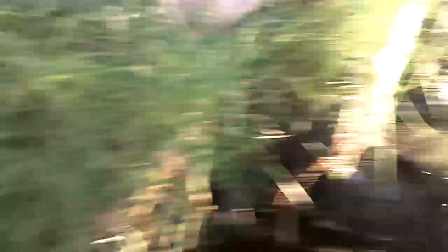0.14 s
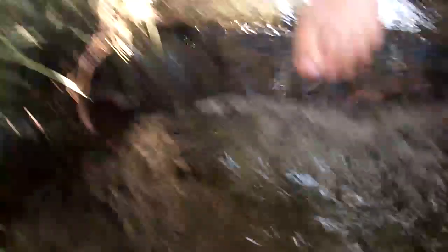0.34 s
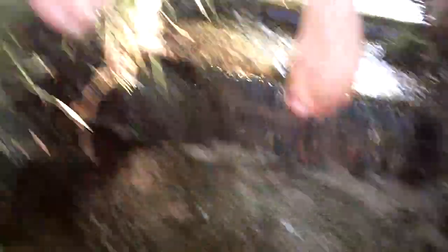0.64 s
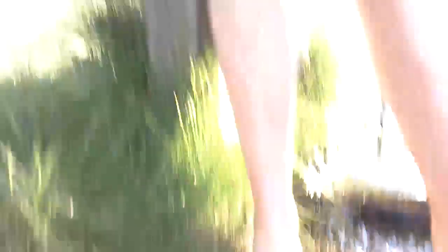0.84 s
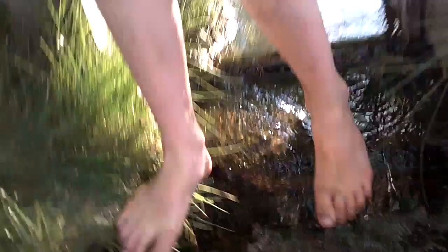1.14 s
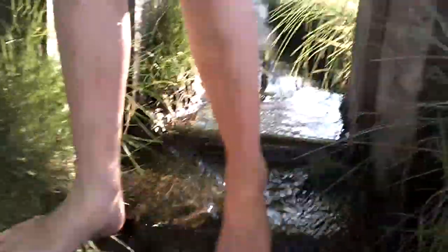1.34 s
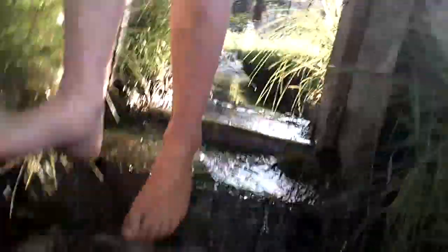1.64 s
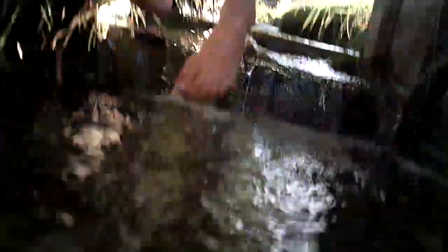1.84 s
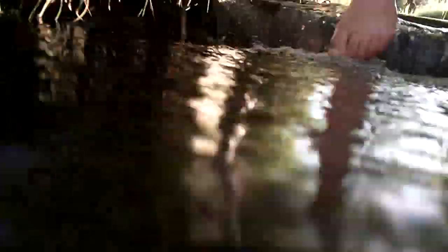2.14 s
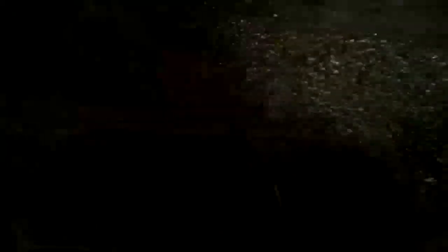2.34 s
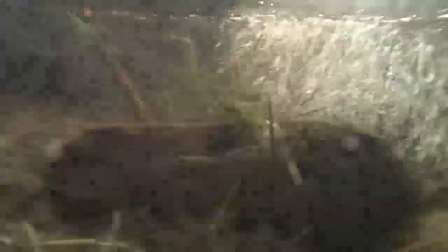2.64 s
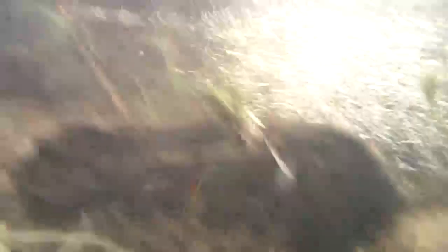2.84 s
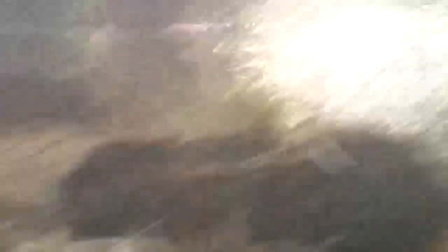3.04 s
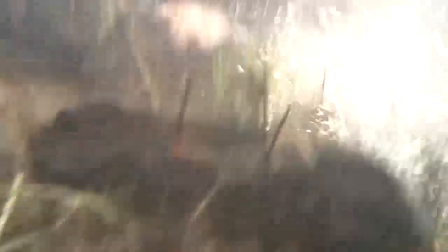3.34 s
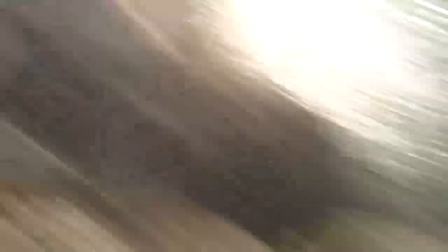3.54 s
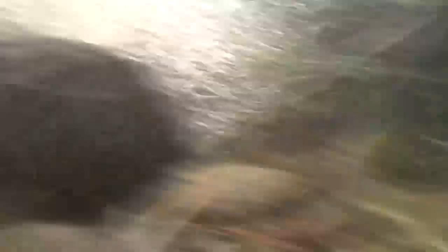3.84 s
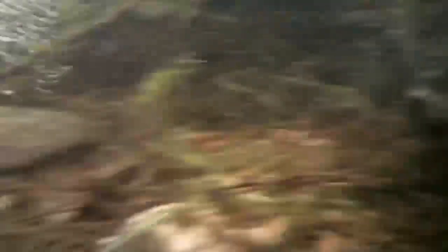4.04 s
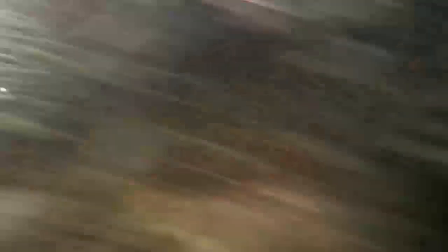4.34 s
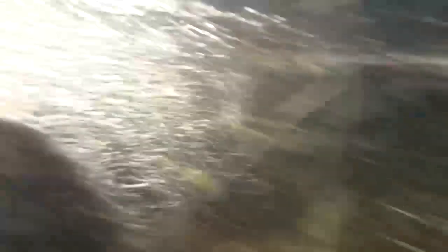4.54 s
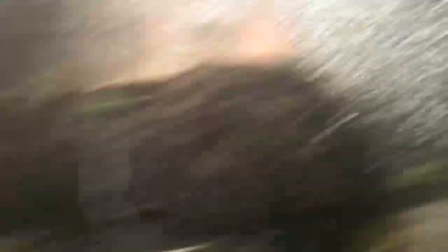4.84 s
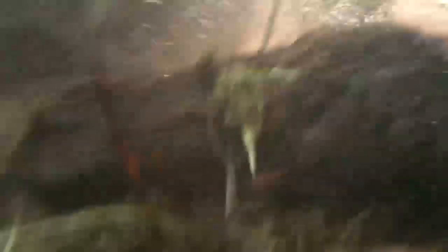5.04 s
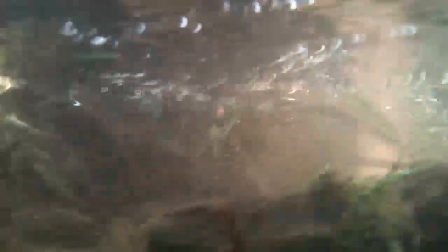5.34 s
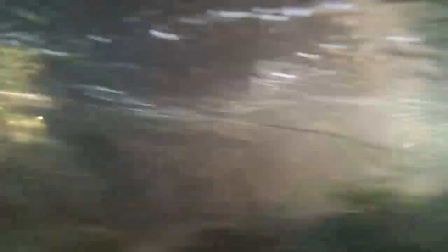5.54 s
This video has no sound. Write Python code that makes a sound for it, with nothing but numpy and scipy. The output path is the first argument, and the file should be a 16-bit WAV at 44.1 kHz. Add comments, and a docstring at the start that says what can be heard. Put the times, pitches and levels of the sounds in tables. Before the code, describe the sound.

A cheap handheld microphone hears shallow stream water splash and trickle for two and a half seconds, slightly louder near the end. It is then submerged: the airy hiss vanishes, replaced by a burst of booming, clipping shoves, then uneven bassy surges, scattered knocks, bubble pops and wet gurgles until the end.

```python
"""First a splashing brook in air: hiss, droplets, ringing splashes, a hollow's drone and a faint hum.
Then the small camera carried over it is pushed under. The current shoves its case in slow swings of
pressure, bubbles gurgle and tick as short decaying sines, and a thin sawtooth buzz rides on the extremes
of the swings. Hisses are filtered noise, some mixed with bubble grains; after hard shoves the recorder's
level drops and recovers."""
import sys
import numpy as np
from scipy import signal
from scipy.fft import rfft, irfft, next_fast_len
from scipy.io import wavfile
from scipy.ndimage import uniform_filter1d

SR = 44100
rng = np.random.default_rng(int(sys.argv[2]) if len(sys.argv) > 2 else 0)


def to_wav(s):
    """Save 16-bit WAV."""
    ch = np.atleast_2d(s).T  # columns
    pcm = np.round(np.clip(ch, -1, 1) * 32767)  # PCM
    wavfile.write(sys.argv[1], SR, pcm.astype(np.int16))


N = 250929
TIME_S = np.arange(N) / SR
DIP_S = 2.49  # the microphone goes under


def gain_of(db):
    """Logarithmic level: decibels to amplitude."""
    return 10 ** (np.asarray(db) / 20)


def evened(x):
    """Mean power: scales a signal to rms 1."""
    return x / np.sqrt(np.mean(x ** 2) + 1e-20)


def curves(rows):
    """Linear interpolation: the columns of a table, one value a sample."""
    s, *columns = np.transpose(rows)
    return [np.interp(TIME_S, s, column) for column in columns]


def coloured(x, gain):
    """Linear filtering: weights the spectrum by gain(Hz)."""
    size = next_fast_len(N + 4096)
    hz = np.fft.rfftfreq(size, 1 / SR) + 1  # 1 Hz up, so that its logarithm exists
    return irfft(rfft(x, size) * gain(hz), size)[:N]


def tone(points):
    """Spectral envelope: gain function of a table, interpolated over log frequency."""
    hz, db = np.transpose(points)
    return lambda f: gain_of(np.interp(np.log(f), np.log(hz), db))


def noise(points):
    """Filtered noise: white noise given a spectral envelope, rms 1."""
    return evened(coloured(rng.standard_normal(N), tone(points)))


def drift(rate_hz):
    """Low-passed noise: slow chance, rms 1."""
    return evened(coloured(rng.standard_normal(N), lambda f: 1 / (1 + (f / rate_hz) ** 2)))


def wavering(db, depth_db, rate_hz):
    """Random amplitude modulation: a level that drifts by depth_db rms, as amplitude."""
    return gain_of(db + depth_db * drift(rate_hz))


def grains(lo_hz, hi_hz, cycles, per_s, spread_db, count=10):
    """Bubble resonance: random short rings of many sizes, each rising in pitch; rms 1 in all."""
    out = np.zeros(N)
    sizes = gain_of(spread_db * np.minimum(rng.exponential(1, N), 4))
    sizes *= rng.random(N) < per_s / SR
    kind = rng.integers(0, count, N)
    for k, hz in enumerate(np.geomspace(lo_hz, hi_hz, count)):
        turns = np.arange(1500) * hz / SR
        rising = np.sin(2 * np.pi * turns * (1 + 0.013 * turns))
        ring = rising * np.exp(-turns / cycles) * np.sqrt(hz)
        out += signal.oaconvolve(sizes * (kind == k), ring)[:N]
    return evened(out)


def rings(rows, click):
    """Damped oscillation: dying sines, each set off by a short click of noise."""
    size = 4000
    out, t = np.zeros(N + SR), np.arange(size) / SR
    chances = uniform_filter1d(rng.standard_normal((len(rows), size)), size=4)
    for (s, db, hz, t60), chance in zip(rows, chances):
        decay = gain_of(-60 * t / max(t60, .002))
        attack = 1 - np.exp(-t * hz * 3)
        ring = decay * attack * np.sin(2 * np.pi * hz * t)
        burst = click * min(hz / 1500, 1) ** 2 * chance * np.exp(-t / 0.0018)  # weaker at low pitch
        out[round(s * SR):][:size] += gain_of(db) * (ring + burst)
    return out[:N]


def submerged(fade_s):
    """Linear crossfade: 0 in the air, 1 once the microphone is under."""
    return np.clip((TIME_S - DIP_S) / fade_s, 0, 1)


# Hard shoves on the case, a push and its rebound:
# (time [s], push [amplitude], rebound [amplitude], spacing [s], width [s])
SHOVE_PULSES = [(2.498, -0.5, -0.44, 0.0092, 0.0048), (2.518, -0.56, 0.39, 0.008, 0.0012),
                (2.545, -0.69, .15, 0.026, 0.0024), (2.634, -0.61, 1.34, 0.012, 0.0029),
                (2.661, -1.56, .9, 0.0098, 0.0032), (2.683, -1.3, 1.1, .009, 0.0025),
                (2.706, -1.42, 1.1, 0.0088, 0.003), (2.734, -1.4, 1.25, 0.011, 0.003),
                (2.784, -0.89, 1.39, .013, 0.0032), (2.873, -0.96, 0.966, 0.014, 0.0039),
                (3.084, -0.23, 0.38, 0.0033, 0.0011), (3.11, -0.54, 0.059, 0.0116, 0.003),
                (3.172, 0.65, 0.017, 0.027, 0.014), (3.223, 0.59, -.3, .016, 0.0036),
                (3.290, -0.91, 0.69, 0.021, 0.0048), (3.66, -0.63, 0.51, 0.01, 0.0035),
                (3.815, -0.92, 0.99, 0.0219, 0.0064), (4.178, -1.025, 0.65, 0.017, 0.0068),
                (4.468, -0.45, -0.68, 0.011, 0.0036), (4.668, -0.72, 0.24, 0.014, 0.0048),
                (5.243, -0.57, 0.26, 0.017, 0.0047)]


def shoves():
    """Pressure impulse: each shove is a sharp push and a rebound that sags back slowly."""
    out = np.zeros(N)
    for s, push, rebound, spacing, width in SHOVE_PULSES:
        out += push / (1 + ((TIME_S - s) / width) ** 2) ** 1.17
        late = TIME_S - s - spacing
        rebound_width = width * np.where(late > 0, 1.8, 1.1)
        out += rebound / (1 + (late / rebound_width) ** 2) ** 1.08
    return out


# Slow swings and churn of the current, before level drop, stir and drift:
# (time [s], swing level [dB], churn level [dB])
CURRENT_LEVELS = [(2.48, -14, -32), (2.6, -3.5, -27), (2.75, 3.5, -26.5), (3.0, -13, -22.5),
                  (3.15, -7, -30.5), (3.4, -15.5, -37.5), (3.65, -12.5, -31), (3.9, -4, -34.5),
                  (4.1, -14.5, -37), (4.35, -13, -35), (4.5, -10.5, -22), (4.62, -16.5, -37),
                  (4.9, -12.5, -26), (5.2, -11, -33.5), (5.35, -13, -31.5), (5.58, -13, -35),
                  (5.69, -23, -30)]
# Spectral envelope of the churn: (frequency [Hz], relative gain [dB])
CHURN_SPECTRUM = [(40, -34.5), (70, 5.5), (130, -2), (220, -10.5), (400, -49.5), (2000, -100)]
SWING_DROP, CHURN_DROP = 0.53, 1  # shares of the level drop
CHURN_STIR_DB = 27  # dB per unit of stirring pressure


def current(pushes, drop_db, stir):
    """Superposition: uneven slow swings of pressure, churn above them, and hard shoves."""
    swing_db, churn_db = curves(CURRENT_LEVELS)
    swings = np.cos(2 * np.pi * swing_turns())
    swings *= wavering(swing_db + SWING_DROP * drop_db, 2.5, 12)
    churn = noise(CHURN_SPECTRUM)
    churn *= wavering(churn_db + CHURN_DROP * drop_db + CHURN_STIR_DB * stir, 3.04, 11.8)
    flow = (swings + churn) * submerged(.02)
    for s, push, rebound, spacing, width in SHOVE_PULSES:  # swings and churn dip around each shove
        nearness = (TIME_S - s - spacing / 2) / (1.88 * spacing + 0.0081)
        flow *= 1 - 0.63 * np.exp(-nearness ** 2)
    return flow + pushes


SWING_HZ = 20  # nominal rate; the gaps between buzzes bend it


def swing_turns():
    """Phase modulation, in turns: an extreme under every buzz, swings of wandering pace in long gaps."""
    extremes = np.sort([0] + [s + length / 2 for s, db, length in BUZZ_BURSTS] + [N / SR])
    half_turns = np.maximum(np.round(np.diff(extremes) * 2 * SWING_HZ), 1)
    halves = np.r_[0, np.cumsum(half_turns)]
    at = np.interp(TIME_S, extremes, halves)
    free = np.interp(at, halves[:-1] + half_turns / 2, half_turns > 1)  # 1 in the long gaps
    return at / 2 + 0.2 * free * drift(11.5)


DROP_KNEE, DROP_DB_PER_UNIT = 0.48, 56.5  # pressure where it sets in; depth per unit over that
DROP_LAG_S, RECOVER_DB_PER_S = 0.011, 137


def level_drop(pressure):
    """Dynamic compression: the recorder's level falls fast after strong pressure, recovers steadily [dB]."""
    depth_db = DROP_DB_PER_UNIT * np.clip(abs(pressure) - DROP_KNEE, 0, 1 - DROP_KNEE)
    climb_db = RECOVER_DB_PER_S * TIME_S
    held_db = np.maximum.accumulate(depth_db + climb_db) - climb_db
    late_db = np.interp(TIME_S - DROP_LAG_S, TIME_S, held_db)
    return -uniform_filter1d(late_db, size=300)


# Single bubbles and ticks ringing at the microphone:
# (time [s], level [dB], pitch [Hz], decay by 60 dB [s], at least 0.002)
BUBBLE_POPS = [(2.481, -5.5, 502, 0.0064), (2.516, -10.5, 700, .006), (2.577, -23, 500, 0.008),
               (2.632, -19, 603, 0.0076), (2.6569, -14, 2260, 0.002), (2.68, -27, 726, 0.016),
               (2.6878, -28.5, 6230, 0.0039), (2.702, -30.5, 716, 0.014), (2.793, -33.5, 678, 0.014),
               (2.866, -29.5, 394, 0.021), (3.0365, -22, 1540, 0.0094), (3.082, -25, 250, .05),
               (3.221, -14, 703, 0.0046), (3.239, -25, 895, 0.0094), (3.273, -22.5, 200, 0.047),
               (3.509, -25.5, 384, 0.056), (3.6154, -29, 1276, 0.0086), (3.6232, -10.5, 1704, .014),
               (3.6227, -33.5, 3180, 0.0047), (3.715, -24, 358, 0.035), (3.8482, -36, 1900, 0.009),
               (4.0028, -32, 4100, .005), (4.1515, -41, 3326, 0.022), (4.173, -13, 964, 0.0056),
               (4.371, -14.5, 2060, 0.0027), (4.3784, -25, 3220, 0.007), (4.3884, -28.5, 3350, .012),
               (4.459, -17.5, 391, 0.058), (4.598, -22.5, 377.6, 0.17), (4.6423, -24.5, 3340, .005),
               (4.6633, -11, 1830, 0.0094), (4.6744, -25.5, 3336, 0.0068), (4.855, -15, 427, 0.063),
               (4.856, -22, 750, 0.03), (5.112, -18, 783, 0.042), (5.2284, -22, 1360, 0.024),
               (5.229, -12.5, 437, 0.049), (5.238, -10, 1520, .014), (5.4, -21, 336, 0.042),
               (5.461, -17, 326, 0.073), (5.549, -23, 321.6, 0.041), (5.569, -32.5, 843.5, 0.082),
               (5.5692, -38, 1725, .02), (5.587, -29, 800, 0.093), (5.5877, -31, 1720, .02),
               (5.6, -37, 1720, 0.016), (5.616, -24.5, 1080, 0.035), (5.624, -25.5, 850, .05),
               (5.626, -31, 1200, 0.027), (5.634, -29, 815, 0.045), (5.6386, -33.5, 4000, .007),
               (5.66, -17.5, 934, 0.033), (5.66, -28.5, 1620, .04), (5.6675, -30.5, 3897, 0.0075),
               (5.671, -29, 810, .04), (5.674, -22.5, 1090, 0.052), (5.678, -34, 1552, .03)]


def pops():
    """Damped resonance: single bubbles and ticks ring and die away."""
    return rings(BUBBLE_POPS, 0.19)


# Bubbles in the flow, before level drop, stir and drift:
# (time [s], gurgle level [dB], burble level [dB], fizz level [dB], sizzle level [dB])
BUBBLE_LEVELS = [(2.48, -31.5, -37, -51, -60), (2.6, -38.5, -54.5, -61, -68), (2.8, -36, -64, -70, -87.5),
                 (2.95, -42.5, -51.5, -58, -82.5), (3.1, -38, -49, -55.5, -79.5),
                 (3.2, -47, -59, -69.5, -70), (3.38, -45.5, -53.5, -62.5, -82),
                 (3.52, -42.5, -50.5, -62, -72), (3.7, -44, -58.5, -69, -76), (3.95, -47, -54, -53, -81),
                 (4.1, -43.5, -57.5, -71.5, -65.5), (4.4, -37, -50.5, -57.5, -63),
                 (4.55, -37, -52, -59, -62.5), (4.85, -29, -50.5, -62, -66.5),
                 (5.1, -33.5, -43.5, -49, -69), (5.22, -48.5, -57, -75, -78), (5.42, -32.5, -57, -61, -72),
                 (5.52, -37.5, -48, -60, -78), (5.6, -34, -44.5, -58, -78), (5.69, -32, -41, -47, -74)]
# Spectral envelopes of fizz and sizzle: (frequency [Hz], relative gain [dB])
FIZZ_SPECTRUM = [(500, -16.5), (1100, -19.5), (1600, -3.5), (2300, -7.5), (3500, -9), (5000, -18.5),
                 (7000, -10.5), (9000, -36), (16000, -47)]
SIZZLE_SPECTRUM = [(2000, -34), (3000, -5.5), (3500, -3.5), (5000, -7.5), (7000, -12), (9000, -45.5)]
GURGLE_DROP, BURBLE_DROP, FROTH_DROP = 0.62, 0.59, 0.81  # shares of the level drop
GURGLE_STIR_DB = 20  # dB per unit of stirring pressure


def bubbles(drop_db, stir):
    """Bubble resonance by size: low gurgle, brighter burble, fine fizz and sizzle mixed with noise."""
    gurgle_db, burble_db, fizz_db, sizzle_db = curves(BUBBLE_LEVELS)
    gurgle = grains(232.3, 432.5, 1.72, 1500, 2.1)
    gurgle *= wavering(gurgle_db + GURGLE_DROP * drop_db + GURGLE_STIR_DB * stir, 2.6, 34)
    burble = grains(500, 1450, 1.7, 2500, 3.0)
    burble *= wavering(burble_db + BURBLE_DROP * drop_db, 3.7, 30)
    froth = 0.64 * rng.standard_normal(N) + 0.55 * grains(1446, 5000, 1.8, 1200, 6.5, count=6)
    fizz = evened(coloured(froth, tone(FIZZ_SPECTRUM))) * wavering(fizz_db, 3.4, 40)
    sizzle = evened(coloured(froth, tone(SIZZLE_SPECTRUM))) * gain_of(sizzle_db)
    froths = (fizz + sizzle) * gain_of(FROTH_DROP * drop_db)
    return (gurgle + burble + froths) * submerged(0.0055)


# Buzzes on the extremes of the swings:
# (time [s], level [dB], before a lift of 17 dB, length [s], at least 0.002)
BUZZ_BURSTS = [(2.458, -52, 0.008), (2.4834, -44, 0.008), (2.4938, -40.5, 0.0051), (2.508, -49, 0.013),
               (2.541, -43.5, 0.008), (2.599, -58, 0.01), (2.6114, -47.5, 0.0074), (2.628, -46, 0.0096),
               (2.6667, -64, 0.013), (2.689, -56, 0.008), (2.733, -68, 0.0074), (3.0839, -49, 0.0058),
               (3.1067, -44.5, 0.0059), (3.164, -43.5, 0.013), (3.2055, -51.5, 0.008),
               (3.219, -45.5, 0.0075), (3.2376, -48, 0.0092), (3.269, -47.5, 0.0041),
               (3.284, -43.5, 0.0067), (3.487, -48.5, 0.0056), (3.5184, -47, 0.008),
               (3.5429, -46.5, 0.0039), (3.5678, -53, 0.008), (3.6147, -50, 0.008), (3.641, -51, 0.013),
               (3.663, -44, 0.008), (3.69, -47.5, 0.0072), (3.736, -44.5, 0.008), (3.768, -50, 0.008),
               (3.79, -52, 0.0046), (3.8073, -44.5, 0.0085), (3.964, -47, 0.0089), (4.009, -48, 0.017),
               (4.0514, -50.5, 0.0075), (4.139, -53, 0.008), (4.17, -40.5, 0.0096), (4.3155, -53.5, 0.008),
               (4.327, -49.5, 0.0083), (4.357, -53, 0.008), (4.3824, -51.5, 0.012), (4.4694, -48, 0.011),
               (4.5264, -44.5, 0.0061), (4.613, -46, 0.008), (4.6746, -47, 0.0096), (4.7496, -53, 0.0099),
               (4.856, -51.5, 0.011), (4.8645, -47.5, 0.008), (4.9263, -47.5, 0.008), (4.965, -47, 0.0063),
               (4.9985, -44, 0.0067), (5.057, -48, 0.012), (5.1293, -56, 0.0062), (5.1594, -45, 0.0059),
               (5.184, -49, 0.0066), (5.2285, -54, 0.0063), (5.24, -46.5, 0.008), (5.2926, -51, 0.01),
               (5.3134, -47.5, 0.0046), (5.4, -47, 0.0097), (5.4355, -51, 0.008), (5.48, -48, 0.0055),
               (5.5555, -47.5, 0.0064)]
STEP_HZ = 2400


def crest_buzz():
    """Gated sawtooth on a fixed beat: scattered steps in faint bursts, a steady tone in strong ones."""
    beats = TIME_S * STEP_HZ
    chance = rng.random(int(beats[-1]) + 1)[beats.astype(int)]  # one draw a beat
    level = np.zeros(N)
    for s, db, length in BUZZ_BURSTS:
        length = max(length, .002)
        share = np.clip((db + 55.5) / 22, .2, 1)  # the stronger the burst, the more beats step
        at = slice(round(s * SR), round((s + length) * SR))
        arch = abs(np.sin(np.pi * (TIME_S[at] - s) / length)) ** 0.29
        level[at] += gain_of(db + 17.0) * (chance[at] < share) * arch
    return level * (beats % 1 - .5)


# Single splashes, plops and gulps: (time [s], level [dB], pitch [Hz])
SPLASH_RINGS = [(0.005, -30.5, 643), (0.127, -34.5, 169.6), (0.145, -27, 1580), (0.188, -30.5, 164),
                (0.2408, -22.5, 4330), (0.358, -33.5, 196), (0.38, -21, 1515), (0.402, -17, 2040),
                (0.409, -15, 1920), (0.4135, -11, 2045), (0.506, -32.5, 151), (0.5552, -21, 3640),
                (0.5807, -26, 1570), (0.585, -31.5, 165), (0.6828, -19.5, 3800), (0.692, -31, 162),
                (0.72, -34.5, 680), (0.775, -28, 990), (0.993, -35, 610), (1.0153, -17, 4530),
                (1.146, -16, 3970), (1.229, -35, 154), (1.2325, -25, 1620), (1.263, -32, 896),
                (1.3283, -17, 4620), (1.33, -34, 562), (1.345, -17.5, 4530), (1.49, -23.5, 2020),
                (1.446, -36, 172), (1.6157, -17, 5400), (1.67, -17, 5440), (1.737, -29, 1184),
                (1.811, -34, 168), (1.8295, -22.5, 3670), (1.832, -33, 867), (1.8672, -20.5, 2100),
                (1.954, -20.5, 3680), (2.013, -29, 839), (2.0532, -10, 4786), (2.07, -34, 530),
                (2.11, -33, 560), (2.151, -15, 4160), (2.1126, -15.5, 3605), (2.124, -31.5, 239),
                (2.24, -26.5, 804), (2.278, -19.5, 1467), (2.285, -28.5, 772), (2.334, -17, 4450),
                (2.3875, -17, 3500), (2.4369, -5.5, 3590), (2.4822, -23.5, 1550)]
SPLASH_T60_S, SPLASH_SLOPE = 0.039, 0.76  # decay at 1 kHz; higher pitches die sooner by this power


def splashes():
    """Damped resonance: each splash rings at its own pitch, the high ones dying sooner."""
    rows = [(s, db, hz, SPLASH_T60_S / (hz / 1000) ** SPLASH_SLOPE) for s, db, hz in SPLASH_RINGS]
    return rings(rows, 0.41)


# Brook heard through the air: (time [s], level [dB], fine spray level before drift [dB])
BROOK_LEVELS = [(0, -36, -56), (.4, -35.5, -58.5), (.75, -34.5, -57), (.95, -38, -56), (1.4, -36, -55.5),
                (1.75, -37.5, -54), (2.0, -29, -49), (2.3, -30, -55), (2.47, -31.5, -66)]
# Spectral envelopes of the brook and its fine spray: (frequency [Hz], relative gain [dB])
BROOK_SPECTRUM = [(12, -42), (20, -2), (32, 0), (64, -1.5), (90, -7.5), (171, -3), (324, -18.5), (1980, -7),
                  (2680, -7.5), (3540, -6), (4550, -3.5), (6360, -10), (7950, -17.5), (9930, -35),
                  (15500, -40.5)]
SPRAY_SPECTRUM = [(6000, -32), (8500, 1), (10000, 3.5), (12500, -13.5), (15500, -14.5)]
# Bursts of fine spray: (time [s], level [dB], before SPIT_BODY_DB)
SPIT_BURSTS = [(0.145, -31.5), (0.7482, -29), (1.0675, -38), (1.3179, -39), (1.3486, -33), (1.4471, -35),
               (1.492, -28), (1.5585, -32), (1.6132, -36), (1.671, -29), (2.0524, -17), (2.1106, -30),
               (2.3356, -25), (2.4113, -32.5)]
SPIT_T60_S, SPIT_BODY_DB = 0.029, -8  # each burst dies fast; its rms starts below its table level


def brook():
    """Filtered noise and bubble resonance: hiss with flurries of droplets, fine spray and babble."""
    gusts = gain_of(3.4 * drift(74) + 2.0 * drift(22))
    droplets = grains(697.3, 10630, 6.2, 2200, 5.64, count=16)
    spray = 0.66 * rng.standard_normal(N) * gusts + 0.64 * droplets
    brook_db, fine_db = curves(BROOK_LEVELS)
    body = gain_of(brook_db) * evened(coloured(spray, tone(BROOK_SPECTRUM)))
    spits = np.zeros(N)
    for s, db in SPIT_BURSTS:
        spits += gain_of(db - 60 * abs(TIME_S - s) / SPIT_T60_S) * (TIME_S > s)
    fine = evened(coloured(spray, tone(SPRAY_SPECTRUM)))
    fine *= wavering(fine_db, 2.0, 30) + gain_of(SPIT_BODY_DB) * spits
    babble = gain_of(-51) * grains(348, 1000, 3.5, 250, 3.2)
    return body + fine + babble


# A hollow under the falling water, before drift: (time [s], pitch [Hz], level [dB])
HOLLOW_DRONE = [(0.0, 176.4, -45.5), (0.6, 172, -46), (0.85, 168.9, -56.5), (1.75, 172.4, -47.5),
                (1.98, 177.1, -48.5), (2.15, 216.8, -40.5), (2.26, 173, -43), (2.48, 181, -48)]


def hollow():
    """Cavity resonance: a sine drone that wanders in pitch and level."""
    hz, db = curves(HOLLOW_DRONE)
    turns = np.cumsum(hz * (1 + 0.035 * drift(31.7))) / SR
    return wavering(db, 2.7, 25) * np.sin(2 * np.pi * turns)


HUM_HZ, HUM_DB = 55.7, -46  # level before drift


def hum():
    """Simple harmonic tone: a faint sine whose level wavers slightly."""
    return wavering(HUM_DB, 0.63, 3.1) * np.sin(2 * np.pi * HUM_HZ * TIME_S)


def air():
    """Isolation by the water surface: brook, drone and hum fade at the dip; splashes ring out."""
    above = np.clip((DIP_S + .01 - TIME_S) / .016, 0, 1)
    return (brook() + hollow() + hum()) * above + splashes()


# Spectral envelope of the recorder's hiss: (frequency [Hz], relative gain [dB])
HISS_SPECTRUM = [(5000, -25), (8500, -3.5), (12000, -3), (15500, -1)]
HISS_DB, HISS_DROP = -66, 0.76  # level before level drop and drift; share of the level drop


def recorder_hiss(drop_db):
    """Filtered noise: the recorder's thin hiss, added under water."""
    hiss = noise(HISS_SPECTRUM) * wavering(HISS_DB + HISS_DROP * drop_db, 3.0, 20)
    return hiss * submerged(0.0055)


STIR_S = .025  # span of the moving mean of pressure


def scene():
    """Superposition: air, then water; shoves drive the level drop and stir."""
    pushes = shoves()
    drop_db = level_drop(pushes)
    stir = uniform_filter1d(abs(pushes), size=round(STIR_S * SR))
    water = current(pushes, drop_db, stir) + bubbles(drop_db, stir) + pops() + crest_buzz()
    return (air() + water + recorder_hiss(drop_db))[None]


# Notches of the recorder's comb-like filtering: (frequency [Hz], width [Hz])
COMB_NOTCHES = [(2702, 310), (5490, 278), (7900, 1440), (10900, 500), (13100, 660)]
EDGE_HZ = 15600


def record(dry):
    """Linear filtering and clipping: filter notches, loss of the deepest bass, overload, band limit."""
    comb = lambda f: np.prod([abs(f - hz) / np.hypot(f - hz, width) for hz, width in COMB_NOTCHES], 0)
    x = coloured(dry[0], comb)
    x = signal.lfilter(*signal.butter(1, 8, "high", fs=SR), x)
    x = np.clip(x, -1, 1)
    band = signal.firwin(511, EDGE_HZ, window=("kaiser", 9), fs=SR)
    return np.clip(signal.oaconvolve(x, band, "same"), -1, 1)[None]


dry = scene()
out = record(dry)
to_wav(out)
```